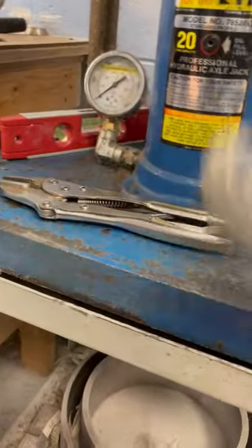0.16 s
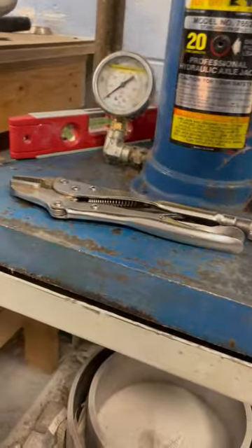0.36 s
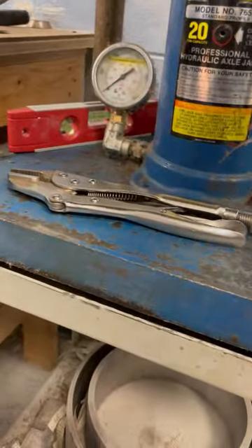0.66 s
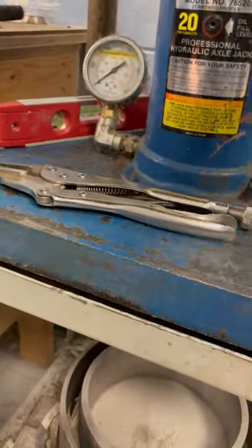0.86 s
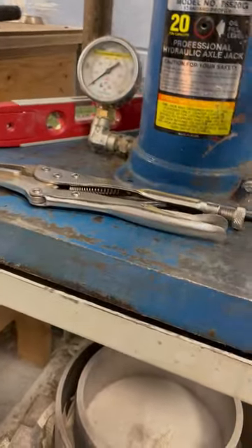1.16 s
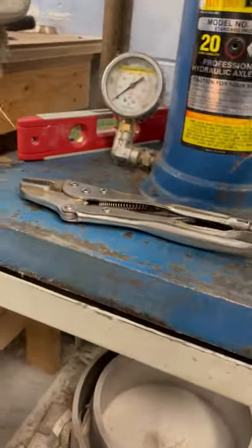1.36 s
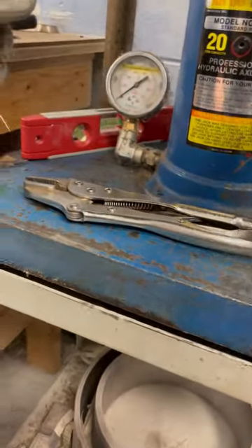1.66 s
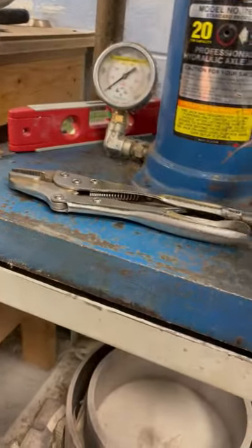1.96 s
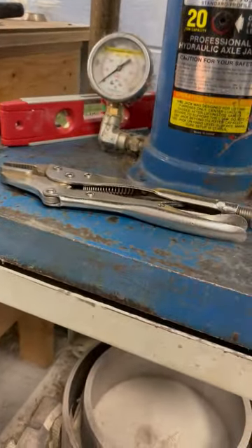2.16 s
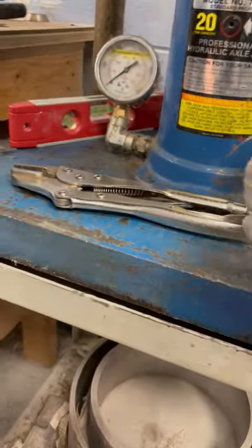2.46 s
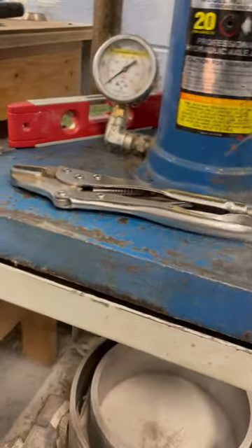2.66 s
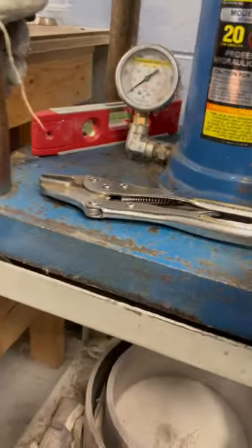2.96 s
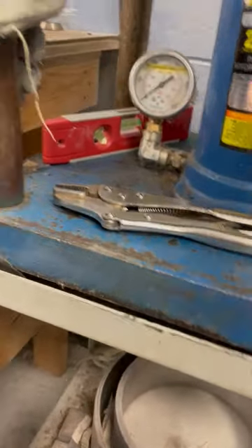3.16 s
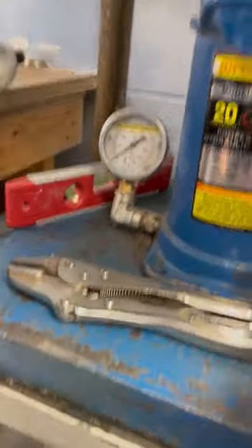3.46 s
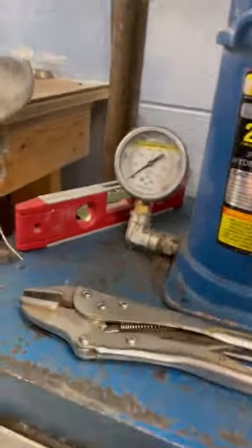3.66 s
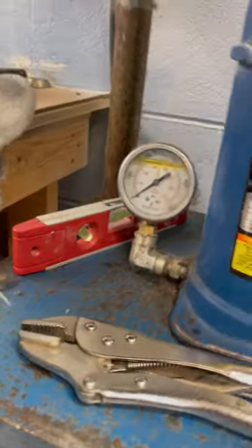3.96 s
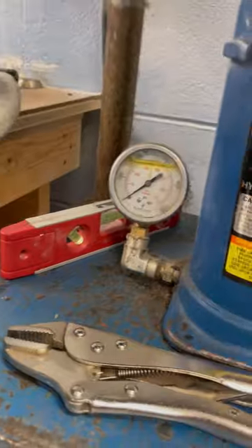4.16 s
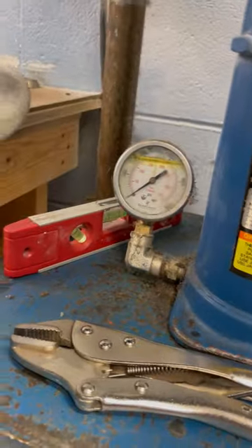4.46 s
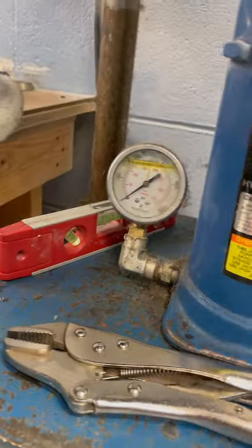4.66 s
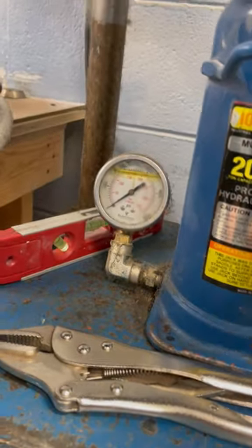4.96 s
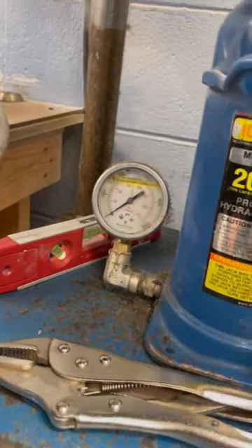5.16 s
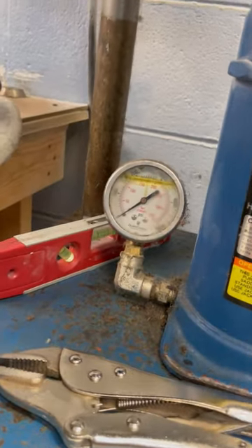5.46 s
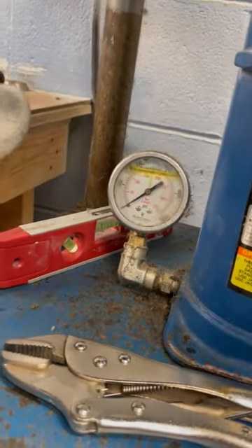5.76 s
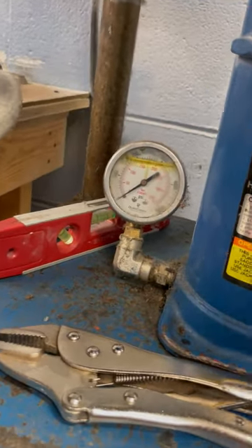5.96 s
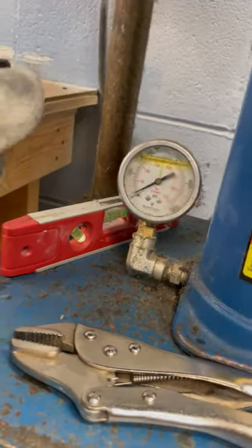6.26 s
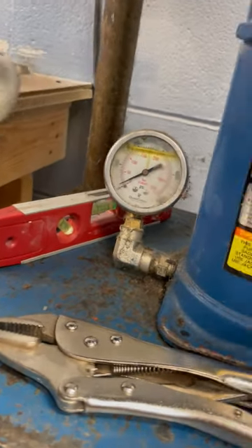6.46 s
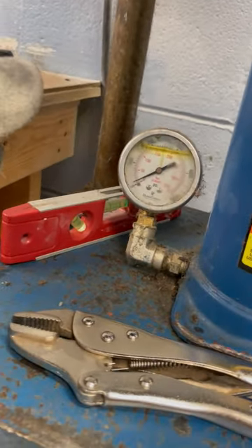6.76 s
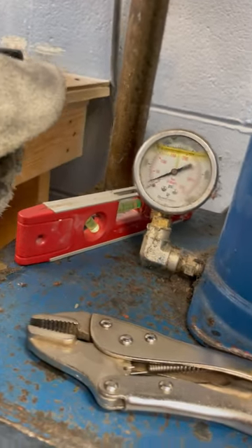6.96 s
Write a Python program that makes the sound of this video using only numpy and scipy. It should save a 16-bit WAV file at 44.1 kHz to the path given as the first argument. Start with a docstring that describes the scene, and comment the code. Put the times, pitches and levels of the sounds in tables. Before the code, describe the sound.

In a small hard-walled workshop, a hydraulic bottle jack on a steel bench is pumped close to a hand-held phone. From 0 to 1.7 seconds, quick strokes come about three per second: bright, gritty slides with thin high squeaks, clacks at both ends, then a light knock and tiny, usually falling valve chirp after each down stroke. Around 1.9 to 2.3 seconds the regular rhythm loosens with small handle taps. Pumping resumes at roughly two strokes per second, with fuller clacks, short hollow bench notes and deeper knocks, strongest around 3.8 to 5.8 seconds. At about 6.17 seconds the handle tube buzzes and rings free, fading over roughly a second amid light rattling taps, an up-stroke clack near 6.5 and a final down-stroke clack at 6.8. Quiet wavering low hum and soft, dull air noise continue throughout.

```python
"""Small workshop: a hydraulic bottle jack on a steel bench, pumped in quick short strokes close to a hand-held phone.
The loose handle slides in its socket as noise through squealing modes, then clacks at each end of the stroke.
The pump knocks after each down stroke, with a valve chirp while slack; the bench adds short hollow notes.
The handle tube, a sum of decaying modes, is once struck free and rings on.
Three wavering hum lines and shaped air noise fill the room."""
import sys
import numpy as np
from scipy import signal
from scipy.fft import rfft, irfft
from scipy.io import wavfile

SR = 44100
rng = np.random.default_rng(int(sys.argv[2]) if len(sys.argv) > 2 else 0)


def put_to_file(sound):
    """Save the sound as 16-bit audio at rate SR, in the file named by the first command-line argument."""
    columns = np.atleast_2d(sound).T  # one column per channel
    safe = np.clip(columns, -1, 1)
    whole_steps = np.round(safe * 32767)
    wavfile.write(sys.argv[1], SR, whole_steps.astype(np.int16))


N = 313551
SIZE = 16384  # samples per contact or room response
AGE_S = np.arange(SIZE) / SR
TIME_S = np.arange(N) / SR
SIDES = np.array([[1], [-1]])  # left, right

# workshop air, relative density: [f/Hz, level/dB]
AIR_COLOUR = [(20, -8.5), (50, 0), (100, 0), (200, -3.5), (400, -4), (520, -10), (1000, -16.5), (1600, -23),
              (3000, -27.5), (6000, -33), (10000, -40.5), (15000, -43)]
# hum line centres: [f/Hz]
HUM_HZ = (100.7, 167.5, 241.5)
# mean level of the hum lines as the phone moves through the room: [t/s, then level/dB per line]
HUM_LEVELS = [(0, -64.5, -60, -58), (1.2, -65, -57, -56), (1.601, -65, -70, -58), (3.1, -64, -63.5, -57.5),
              (3.8, -64, -68.5, -62.5), (7.1, -60.5, -68.5, -61.5)]
# left minus right level at the microphone ports: [f/Hz, difference/dB]
PORT_BALANCE = [(60, 1), (400, -2), (2000, -1.1), (8000, 0)]
# phase between the ports: [f/Hz, phase/rad]
PORT_PHASE = [(50, 0), (1460, 0), (2410, .4), (4050, .5), (5700, .6), (7000, 1.4), (9400, 2.9),
              (10800, 3.4), (12900, 4.7), (14200, 6.1), (16000, 6.3)]

# relative colour of each contact: [f/Hz, level/dB]
SLIDE_COLOUR = [(60, -15.5), (170, -9), (330, -7.5), (700, -7), (1100, -7.5), (1600, -6.5), (2300, 1.5),
                (4500, -5), (6200, 2.5), (7200, -4), (8500, 1), (10000, -1), (12500, 1.5), (15000, -15)]
CLACK_COLOUR = [(50, -13.5), (100, -7.5), (270, -14.5), (600, -8), (1100, -4), (1600, -3.5), (2200, 3.5),
                (3500, -0.5), (6200, 5), (8500, 4), (10000, -1), (12500, 5.5), (15000, -11)]
KNOCK_COLOUR = [(45, -19.5), (100, 2), (170, 2), (550, -3.5), (1100, 0), (1500, -0.5), (2200, 4.5),
                (3200, -7.5), (6200, -7.5), (9000, -5.5), (15000, -16)]
# jack on its bench: [f/Hz, width/Hz, lift/dB]; a negative lift has no effect
JACK_MODES = [(165.3, 12, 7), (369.4, 20, 11), (399, 22, 16.5), (1076, 108, 11.5), (2110, 67, 8),
              (2900, 163, 8), (4090, 49, 5.5), (5474, 100, 10), (8420, 50, 11), (11500, 260, 4.5),
              (12930, 110, -4.5)]
# pump linkage: [f/Hz, width/Hz, lift/dB]
PUMP_MODES = [(167, 9.2, 9), (365, 20, 4), (412, 13, 13.5), (751, 9.1, 10), (1330, 14, 7), (2080, 160, 6),
              (2504, 90, 4), (3150, 8.5, 9.5), (4043, 60, 3.5), (4765, 4.6, 6), (5650, 98, 2.5),
              (7200, 25, 6)]
# socket, excited by every slide: [f/Hz, width/Hz, lift/dB]
SOCKET_MODES = [(2950, 140, 9), (5460, 110, 13.5), (8470, 120, 13), (11750, 350, 10)]
# free handle tube, relative levels: [f/Hz, level/dB, t60/s]
TUBE_MODES = [(680, -12, .5), (1323, -28, 0.45), (1478, -12.5, 1.25), (2078, 0, 0.14), (3100, -20, .35),
              (4070, -2, 0.06), (4275, 4, 0.14), (4730, 0, .17), (5135, 0, .07), (5605, 1, 0.11),
              (6282, -6, .1), (6858, -2, 0.12)]

# down strokes, relative levels: [clack t/s, slide level/dB, nominal squeal f/Hz, clack level/dB,
# bounce delay/s, thud level/dB, knock delay/s, knock level/dB]
PUSHES = [(.127, -18.5, 11000, -24, .006, -33, .056, -25), (.416, -20, 11650, -23, .006, -37, .06, -29),
          (.715, -27, 5500, -13, .007, -27, .072, -27), (1.044, -25, 8350, -15, .003, -29, .068, -26),
          (1.391, -22, 11500, -23, .006, -32, .059, -23.5), (1.716, -27, 8450, -14, .003, -28, .069, -20),
          (2.38, -33, 5400, -14, .013, -30, .093, -22), (2.824, -34, 5450, -15, .01, -23, .097, -21),
          (3.322, -32, 2900, -17.5, .013, -24, .115, -21), (3.823, -28, 5500, -14, .012, -21, .066, -13),
          (4.267, -27.5, 5510, -11, .01, -25, .062, -11.5), (4.653, -29, 2900, -11.5, .003, -29, .062, -15),
          (5.021, -27, 11800, -11.5, .013, -26, .074, -15), (5.431, -29, 2900, -12, .015, -21, .082, -18),
          (5.806, -25, 11650, -16, .004, -24, .072, -17.5), (6.153, -52, 2900, -18, .013, -36, .17, -28),
          (6.829, -27, 8500, -15, .004, -32, .07, -50)]
# up strokes, relative levels: [slide t/s, slide level/dB, nominal squeal f/Hz, clack t/s,
# clack level/dB, bounce delay/s, thud level/dB]
LIFTS = [(.202, -24, 8550, .243, -23, .004, -33), (.495, -35, 5340, .557, -19, .006, -24),
         (.828, -26, 8740, .881, -21, .004, -22), (1.152, -25, 8530, 1.203, -25, .004, -29),
         (1.488, -27.5, 8450, 1.512, -17, .004, -22), (2.111, -29, 8450, 2.166, -20, .003, -32),
         (2.562, -34.5, 2900, 2.62, -17, .003, -36), (3.062, -31, 8450, 3.089, -19, .029, -42),
         (3.555, -34, 5335, 3.593, -20, .018, -30), (4.025, -26, 5460, 4.059, -16.5, .02, -29),
         (4.4, -24.5, 8420, 4.459, -11.5, .004, -40), (4.762, -28, 8470, 4.8, -13, .034, -42),
         (5.2, -27, 8350, 5.22, -17, .026, -38), (5.568, -30.5, 2900, 5.614, -12, .019, -29),
         (5.94, -27, 8230, 5.985, -12, .015, -40), (6.467, -28, 8300, 6.515, -18, .004, -27)]
# shifts of the loose handle in its socket, relative levels: [tap t/s, slide level/dB, tap level/dB]
SHIFTS = [(.1, -44, -17), (1.915, -49, -48), (2.204, -30, -32), (2.285, -58, -39), (2.743, -50, -26),
          (2.78, -45, -31), (3.075, -42, -21), (3.535, -44, -44), (4.025, -40, -44), (5.182, -34, -24),
          (6.066, -52, -32), (6.168, -25, -27), (6.432, -55, -36), (6.484, -40, -18), (6.67, -39, -34),
          (6.767, -36, -25)]

# contact tone, row 0 slack, row 1 under load (coupled to the bench): [body/dB, treble/dB]
PUSH_SLIDE_TONE = [(-1.5, 3), (3, -4)]
PUSH_CLACK_TONE = [(-2, 2), (5, 4)]
LIFT_SLIDE_TONE = [(2, -1.5), (4, -3)]
LIFT_CLACK_TONE = [(-4, 3), (0, -1)]
SHIFT_SLIDE_TONE = [(2, 0), (-3, -4)]
SHIFT_TAP_TONE = [(-4, 2), (1, -6)]

AIR_DB = -52.5
LOADED_S, TUBE_STRIKE_S, TOP_HZ = 2, 6.166, 15900
# main linkage ring, lower under load: (f/Hz, width/Hz, lift/dB)
SLACK_RING, LOADED_RING = (1630, 60, 12), (950, 46, 13)
# bounce: fuller and duller than its clack, weaker the later it lands
BOUNCE_DB, BOUNCE_LOSS_DB_PER_S, BOUNCE_BODY_DB, BOUNCE_TREBLE_DB = 1, 220, 2, -7
# knock body slack and loaded; treble follows knock level about the hard-knock level
KNOCK_BODY_DB, HARD_KNOCK_DB, KNOCK_TREBLE_DB_PER_DB = (-5, .5), -16, .8


def undb(db):
    """Decibels to gain."""
    return 10 ** (np.asarray(db) / 20)


def fade(t_s, t60_s):
    """Exponential decay from t = 0; unity before."""
    return np.exp(-np.log(1000) * np.maximum(t_s, 0) / t60_s)


def bins(size):
    """Frequencies/Hz of a real spectrum, floored at 1 Hz."""
    return np.maximum(np.arange(size // 2 + 1) * SR / size, 1)


def curve(points, hz):
    """Points joined on a log-frequency axis."""
    at_hz, value = np.transpose(points)
    return np.interp(np.log(hz), np.log(at_hz), value)


def walk(rate, size):
    """Random motion: normal knots, joined linearly, `rate` per SR samples; the last knot holds."""
    knots = rng.standard_normal(size // 16)
    return np.interp(np.arange(size) * rate / SR, np.arange(len(knots)), knots)


def add(track, s, sound):
    """Mix a sound in at time s."""
    start = int(s * SR)
    track[:, start:start + sound.shape[-1]] += sound[..., :N - start]


def grit(apart=0.46):
    """Contact noise at the two ports: mostly shared, a little their own."""
    shared, left, right = rng.standard_normal((3, SIZE))
    return shared + apart * np.array([left, right])


def toned(s, tone):
    """Body and treble of a contact at time s: slack or under load."""
    return tone[int(s > LOADED_S)]


def background(waver_db=3.6, drift_hz=3.5, wide_hz=900):
    """A wavering machine hum over dull air noise, nearly alike at both ports in the bass."""
    hz = bins(N)
    mid, side = rfft(rng.standard_normal((2, N))) * undb(curve(AIR_COLOUR, hz))
    air = irfft(mid + SIDES * np.clip(hz / wide_hz, .13, .9) * side, N)
    s, *levels = np.transpose(HUM_LEVELS)
    hum = 0
    for line_hz, line_db in zip(HUM_HZ, levels):
        phase = 2 * np.pi * np.cumsum(line_hz + drift_hz * walk(12, N)) / SR
        level_db = np.interp(TIME_S, s, line_db) + waver_db * walk(5.5, N)
        hum = hum + undb(level_db) * np.sqrt(2) * np.sin(phase)
    return undb(AIR_DB) * air / air.std() + hum


def workshop(x, near_db=-7, near_t60_s=0.083, far_db=-22, far_t60_s=.26, far_top_hz=4000):
    """Direct sound at two ports, quick reflections from bench and wall, and a duller room tail."""
    hz = bins(SIZE)
    balance = undb(SIDES * curve(PORT_BALANCE, hz) / 2)
    paths = balance * np.exp(1j * curve(PORT_PHASE, hz) * (SIDES > 0))
    for db, t60_s, top_hz in ((near_db, near_t60_s, SR / 2), (far_db, far_t60_s, far_top_hz)):
        tails = rng.standard_normal((2, SIZE)) * fade(AGE_S, t60_s) * (AGE_S > .002)
        mid, side = rfft(tails / np.sqrt(np.sum(tails[0] ** 2)))
        apart = np.minimum(hz / 500, 1)  # long waves reach both ports alike
        spread = mid + SIDES * apart * side
        paths = paths + undb(db) * spread / np.sqrt(2 + 2 * (hz / top_hz) ** 2)
    lead = 128  # samples of room for the phase curve's early energy
    response = np.roll(irfft(paths), lead, axis=1)[:, :SIZE * 3 // 4]
    return signal.fftconvolve(x, response, axes=1)[:, lead:lead + N]


def body(force, colour, resonances, body_db, treble_db):
    """Pass a contact force through a causal, resonant body of unit power gain."""
    hz = bins(SIZE)
    tilt_db = curve([(900, body_db), (1900, 0), (5500, 0), (9000, treble_db)], hz)
    gain = undb(curve(colour, hz) + tilt_db)
    lift = sum((undb(db) ** 2 - 1).clip(0) / (1 + (2 * (hz - f_hz) / width_hz) ** 2)
               for f_hz, width_hz, db in resonances)
    gain = gain * np.sqrt(1 + lift)
    # every contact point favours its own set of the dense upper modes
    gain = gain * undb(3 * np.minimum(hz / 3500, 1) * walk(400, len(hz)))
    # fold the cepstrum: minimum phase
    cepstrum = irfft(np.log(gain / np.sqrt(np.mean(gain ** 2))))
    cepstrum[1:SIZE // 2] *= 2
    cepstrum[SIZE // 2 + 1:] = 0
    return irfft(rfft(force) * np.exp(rfft(cepstrum)))


def slides(table, tone, slide_s, squeal_db, level_db=1.2, release_t60_s=0.056, grain_db=2,
           judder_db=3.0, judder_rate=260, squeal_width_hz=70, squeal_scatter=.008):
    """Friction swells as the handle gathers speed; it judders, rings the socket and favours one mode."""
    out = np.zeros((2, N))
    speed = np.sin(np.pi / 2 * np.clip(AGE_S / slide_s, 0, 1)) ** 2.4
    for start_s, db, squeal_hz in table:
        rub = grit() * undb(grain_db * walk(5000, SIZE) + judder_db * walk(judder_rate, SIZE))
        force = rub / rub.std() * speed * fade(AGE_S - slide_s, release_t60_s)
        # the grip differs on every stroke and pulls the mode a little
        pulled_hz = squeal_hz * (1 + squeal_scatter * rng.standard_normal())
        modes = JACK_MODES + SOCKET_MODES + [(pulled_hz, squeal_width_hz, squeal_db)]
        sound = body(force, SLIDE_COLOUR, modes, *toned(start_s, tone))
        add(out, start_s, undb(db + level_db) * sound)
    return out


def blows(table, colour, resonances, level_db, push, slack_db, slack_t60_s, chatter_t60_s,
          settle_db, settle_t60_s, grain_db=2.0):
    """The parts rub as the slack closes, meet with one push and hard chatter, then rattle and settle."""
    out = np.zeros((2, N))
    lead_s, seat_s = .03, .0015
    t_s = AGE_S - lead_s
    contact = np.clip(t_s / seat_s + .5, 0, 1)  # the faces seat
    shove = push * np.sin(np.pi * contact) ** 2  # the momentum carries the bass
    closing = undb(slack_db) * fade(-t_s, slack_t60_s)
    settling = undb(settle_db) * fade(t_s, settle_t60_s)
    loose = np.where(t_s < 0, closing, settling)
    bright = signal.butter(1, 600, "high", fs=SR)
    for s, db, body_db, treble_db in table:
        grains = grit() * contact * fade(t_s, chatter_t60_s) * undb(grain_db * walk(2510, SIZE))
        chatter = signal.lfilter(*bright, grains)
        rattle = grit() * loose * undb(2.3 * walk(300, SIZE))
        sound = body(shove + chatter + rattle, colour, resonances, body_db, treble_db)
        add(out, s - lead_s, undb(db + level_db) * sound)
    return out


def thuds(bench_hz=375, t60_s=.15, rise_s=.007):
    """The bench top gives a short hollow note as the base comes down at the end of each stroke."""
    out = np.zeros((2, N))
    note = np.sin(2 * np.pi * bench_hz * AGE_S) * (1 - np.exp(-AGE_S / rise_s)) * fade(AGE_S, t60_s)
    for s, *_, db, _, _ in PUSHES:
        add(out, s, undb(db) * note)
    for *_, s, _, _, db in LIFTS:
        add(out, s, undb(db) * note)
    return out


def tube(contacts, strike_db=-28.5, held_db=-70, buzz_db=-19.5, buzz_t60_s=.09, buzz_hz=4750,
         buzz_width_hz=700):
    """The tube rings faintly with every contact; struck free, it buzzes on the socket rim and rings on."""
    t_s = TIME_S[:SR]
    ring = sum(undb(db) * np.sin(2 * np.pi * hz * t_s) * fade(t_s, t60_s) for hz, db, t60_s in TUBE_MODES)
    out = undb(held_db) * signal.fftconvolve(contacts, ring[None], axes=1)[:, :N]
    add(out, TUBE_STRIKE_S, undb(strike_db) * ring)
    rim = [(buzz_hz, buzz_width_hz, 20)]
    buzz = body(grit() * fade(AGE_S, buzz_t60_s), SLIDE_COLOUR, rim, 0, -6)
    add(out, TUBE_STRIKE_S, undb(buzz_db) * buzz)
    return out


def valve(level_db=-27, start_hz=2300, start_scatter_hz=250, end_hz=1640, glide_s=.004, rise_s=.0005,
          t60_s=.036):
    """While the oil is still slack, the valve gives a short chirp, usually falling, with each knock."""
    out = np.zeros((2, N))
    for s, *_, after_s, _ in PUSHES:
        if s < LOADED_S:
            first_hz = start_hz + start_scatter_hz * rng.standard_normal()
            hz = end_hz + (first_hz - end_hz) * np.exp(-AGE_S / glide_s)
            envelope = (1 - np.exp(-AGE_S / rise_s)) * fade(AGE_S, t60_s)
            chirp = np.sin(2 * np.pi * np.cumsum(hz) / SR) * envelope
            add(out, s + after_s, undb(level_db + 3.5 * walk(500, SIZE)) * chirp)
    return out


def pump():
    """The linkage knocks once after each down stroke, with a deeper ring under load."""
    out = 0
    for loaded, ring, body_db in zip((False, True), (SLACK_RING, LOADED_RING), KNOCK_BODY_DB):
        rows = [(s + after_s, db, body_db, KNOCK_TREBLE_DB_PER_DB * (db - HARD_KNOCK_DB))
                for s, *_, after_s, db in PUSHES if (s > LOADED_S) == loaded]
        out = out + blows(rows, KNOCK_COLOUR, PUMP_MODES + [ring], level_db=1, push=.22,
                          slack_db=-20, slack_t60_s=0.05, chatter_t60_s=.016,
                          settle_db=-21, settle_t60_s=0.12)
    return out


def clack(s, db, gap_s, tone):
    """The handle meets the socket and bounces once: two rows of (t/s, level/dB, body/dB, treble/dB)."""
    body_db, treble_db = toned(s, tone)
    bounce_db = db + BOUNCE_DB - BOUNCE_LOSS_DB_PER_S * gap_s
    bounce = (s + gap_s, bounce_db, body_db + BOUNCE_BODY_DB, treble_db + BOUNCE_TREBLE_DB)
    return [(s, db, body_db, treble_db), bounce]


def shifts(lead_s=.018, slide_s=.023, squeal_hz=2900, squeal_db=5):
    """A shift is a very short slide with a single light tap."""
    rows = [(s - lead_s, db, squeal_hz) for s, db, _ in SHIFTS]
    rubs = slides(rows, SHIFT_SLIDE_TONE, slide_s, squeal_db)
    return rubs, [(s, db, *toned(s, SHIFT_TAP_TONE)) for s, _, db in SHIFTS]


def lifts(slide_s=.047, squeal_db=19):
    """Going up, the handle squeals more and clacks during its slide or its release."""
    rubs = slides([row[:3] for row in LIFTS], LIFT_SLIDE_TONE, slide_s, squeal_db)
    hits = [hit for *_, s, db, gap_s, _ in LIFTS for hit in clack(s, db, gap_s, LIFT_CLACK_TONE)]
    return rubs, hits


def pushes(lead_s=.052, slide_s=.05, squeal_db=16):
    """Going down, the handle slides for a set time and ends in a clack."""
    rows = [(s - lead_s, db, hz) for s, db, hz, *_ in PUSHES]
    rubs = slides(rows, PUSH_SLIDE_TONE, slide_s, squeal_db)
    hits = [hit for s, _, _, db, gap_s, *_ in PUSHES for hit in clack(s, db, gap_s, PUSH_CLACK_TONE)]
    return rubs, hits


def scene():
    """Handle and pump sit at different spots, so each has its own reflections."""
    rubs, hits = zip(pushes(), lifts(), shifts())
    rubs, hits = sum(rubs), sum(hits, [])
    clacks = blows(hits, CLACK_COLOUR, JACK_MODES, level_db=0, push=.22, slack_db=-22, slack_t60_s=.04,
                   chatter_t60_s=.022, settle_db=-30.5, settle_t60_s=0.084)
    struck = clacks + thuds() + tube(rubs + clacks)
    handle = workshop(rubs, near_db=-8, far_db=-26) + workshop(struck, near_db=-9, far_db=-22)
    knocks = workshop(pump() + valve(), near_db=-11.5, far_db=-20.5)
    return background() + knocks + handle


def record(dry):
    """The phone cuts the top: a steep elliptic low-pass."""
    return signal.sosfilt(signal.ellip(10, .2, 70, TOP_HZ, fs=SR, output="sos"), dry)


dry = scene()
out = record(dry)
put_to_file(out)
```